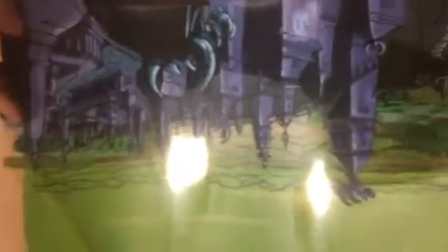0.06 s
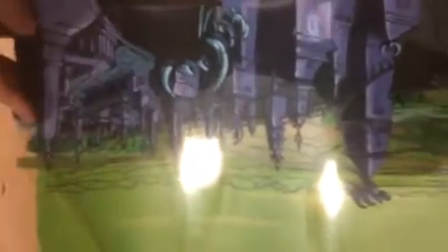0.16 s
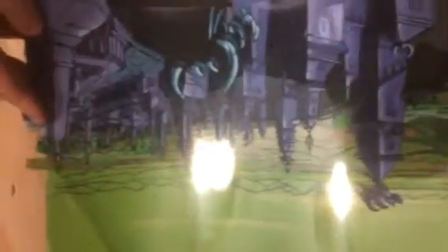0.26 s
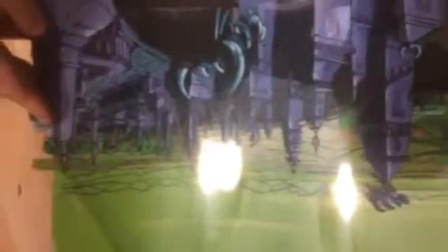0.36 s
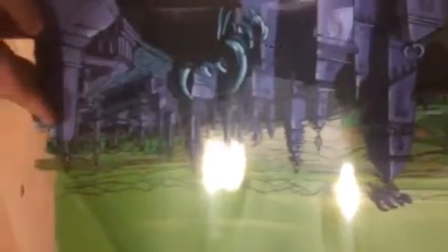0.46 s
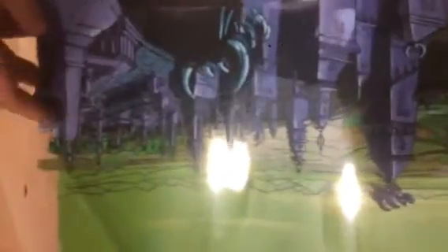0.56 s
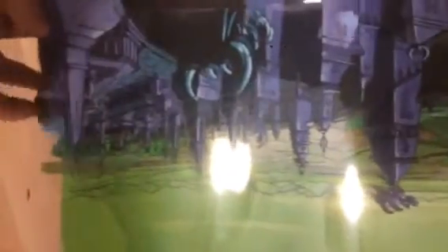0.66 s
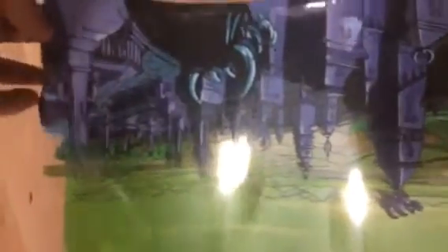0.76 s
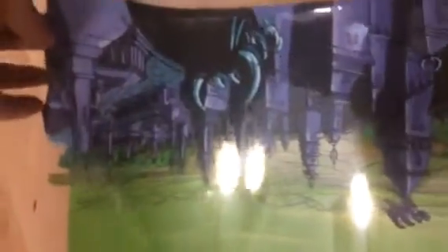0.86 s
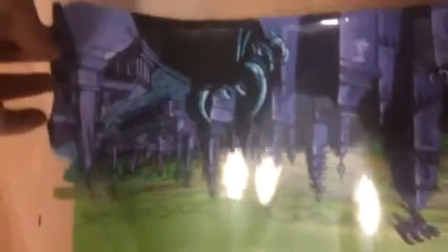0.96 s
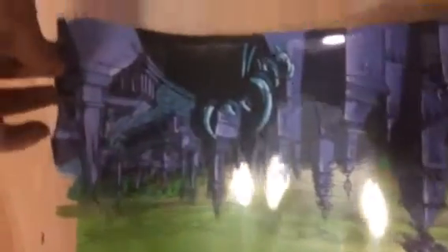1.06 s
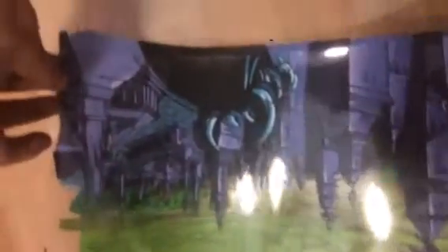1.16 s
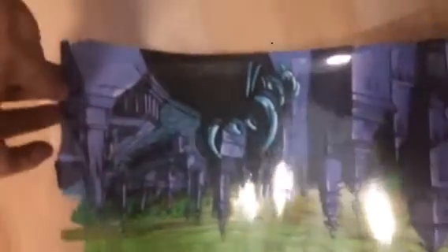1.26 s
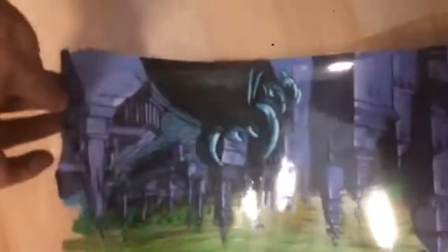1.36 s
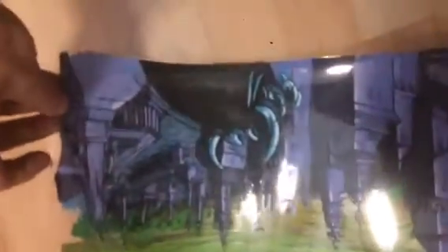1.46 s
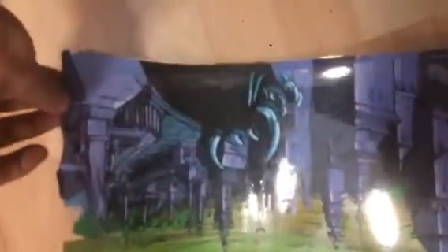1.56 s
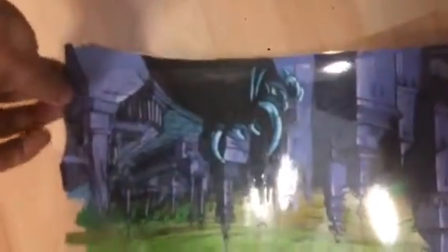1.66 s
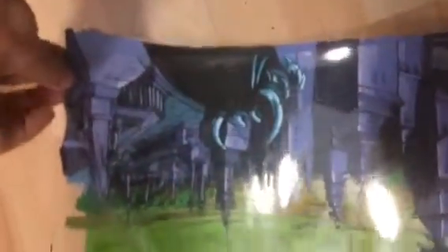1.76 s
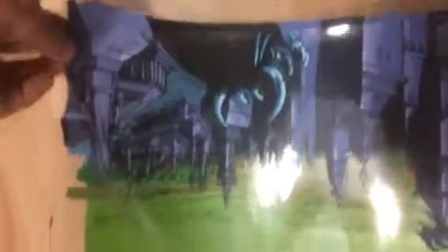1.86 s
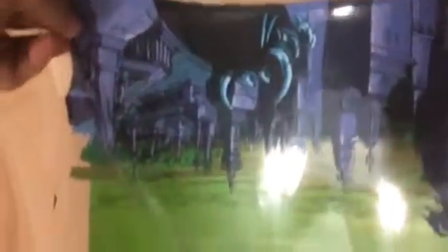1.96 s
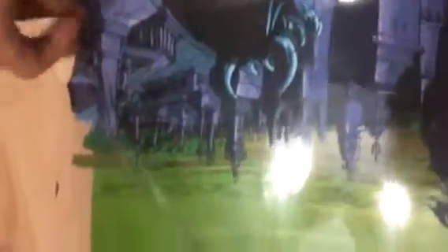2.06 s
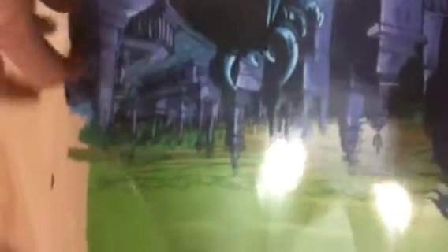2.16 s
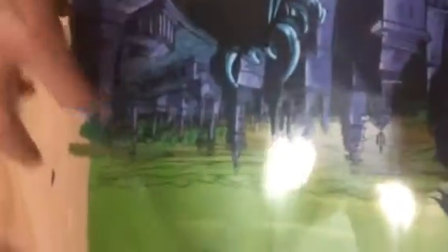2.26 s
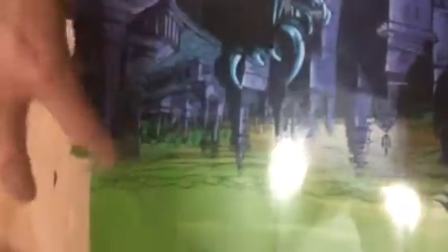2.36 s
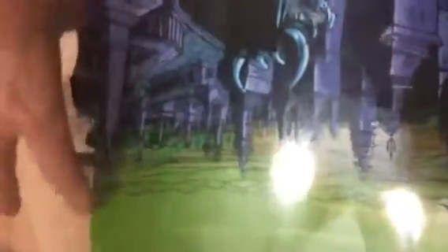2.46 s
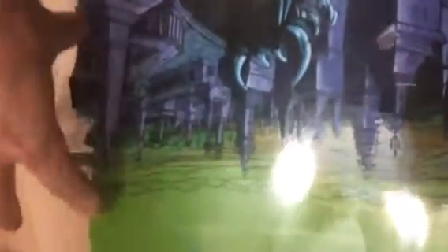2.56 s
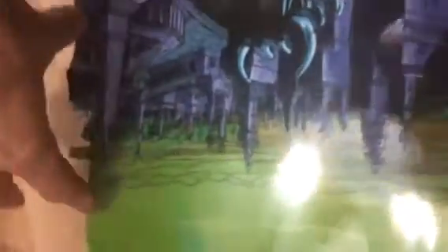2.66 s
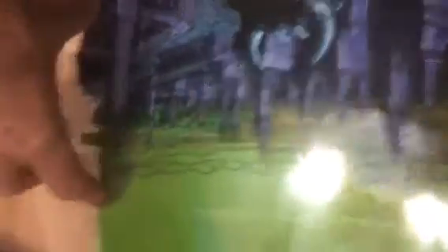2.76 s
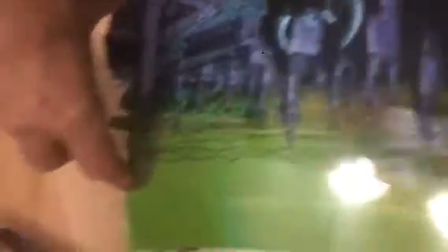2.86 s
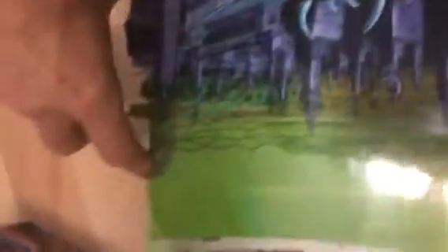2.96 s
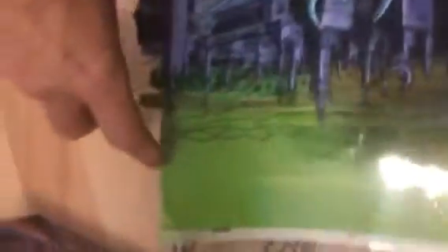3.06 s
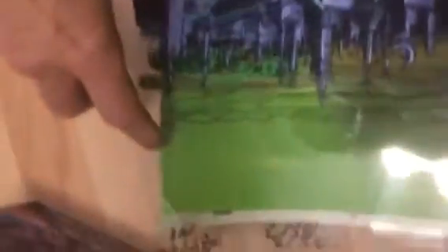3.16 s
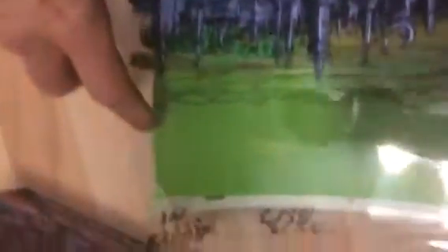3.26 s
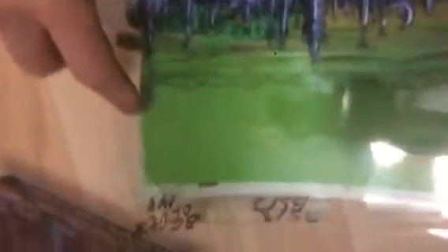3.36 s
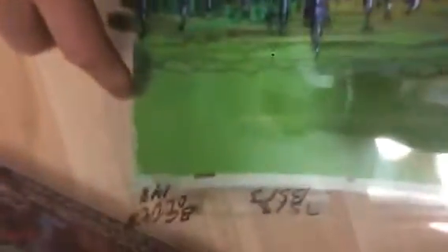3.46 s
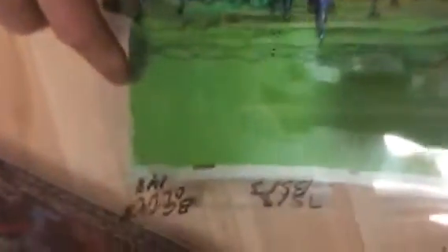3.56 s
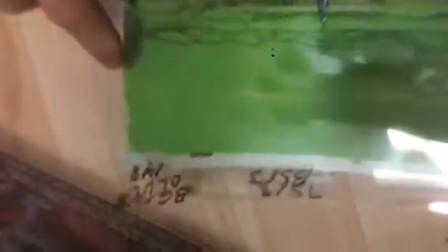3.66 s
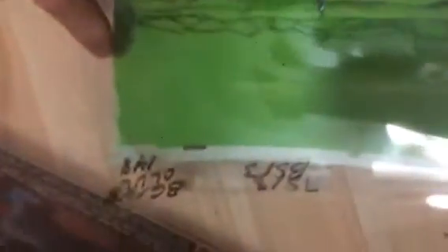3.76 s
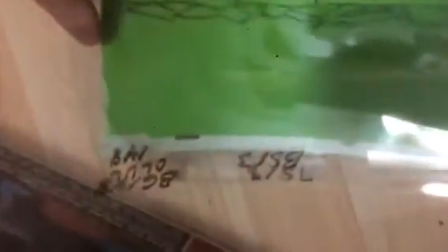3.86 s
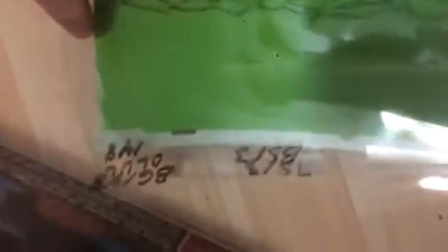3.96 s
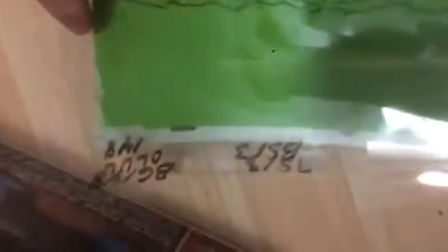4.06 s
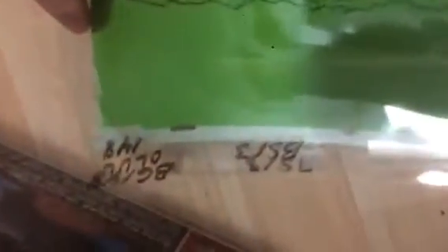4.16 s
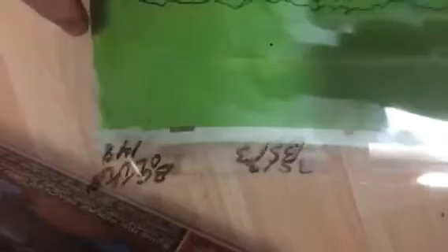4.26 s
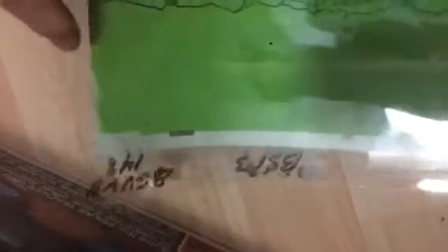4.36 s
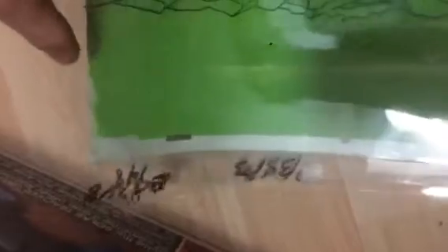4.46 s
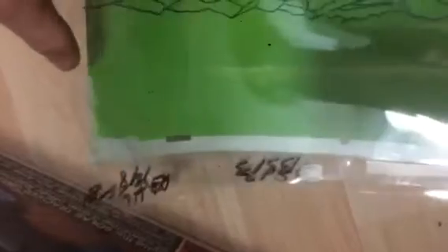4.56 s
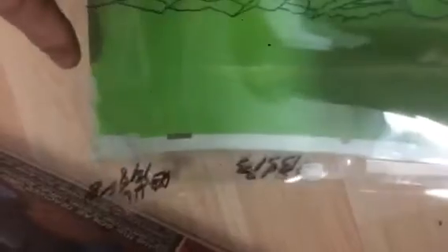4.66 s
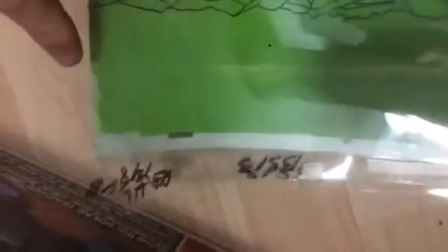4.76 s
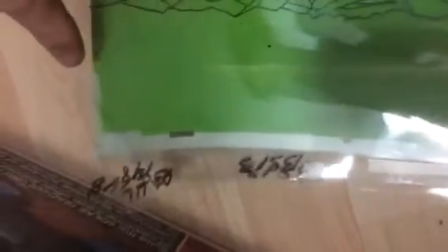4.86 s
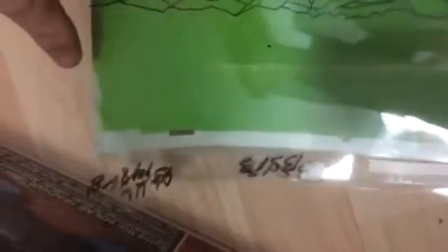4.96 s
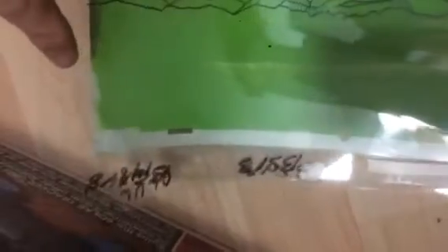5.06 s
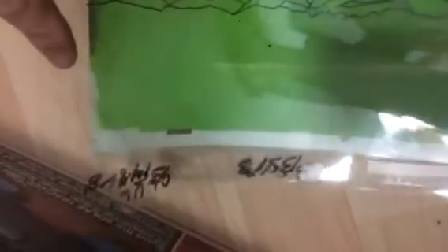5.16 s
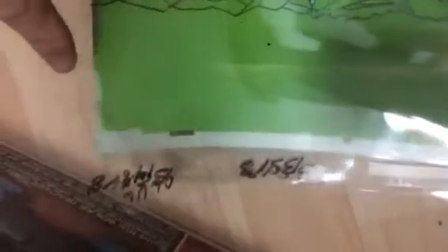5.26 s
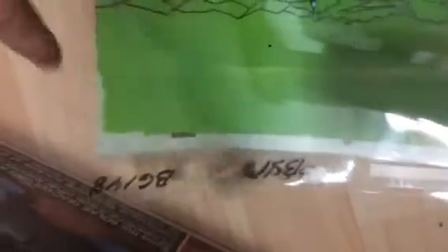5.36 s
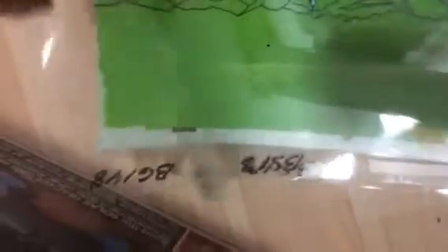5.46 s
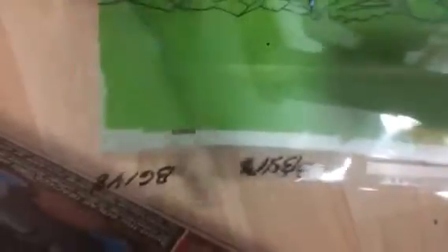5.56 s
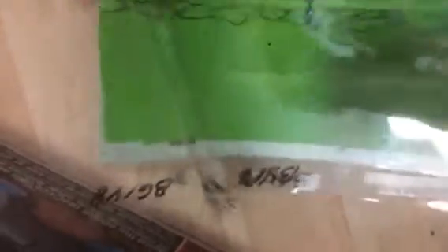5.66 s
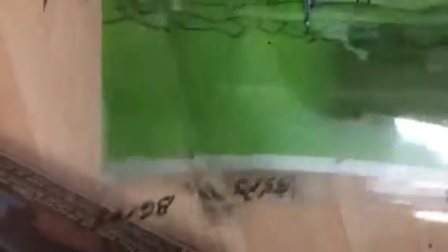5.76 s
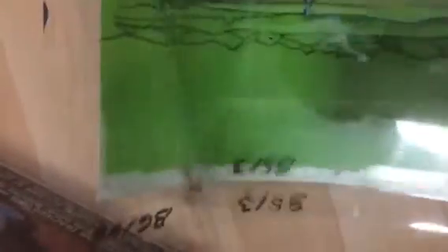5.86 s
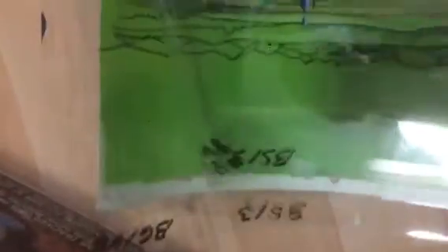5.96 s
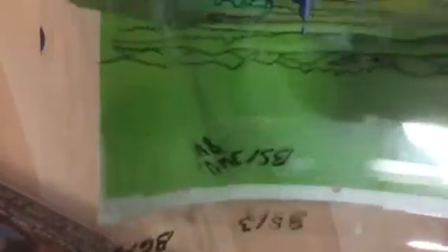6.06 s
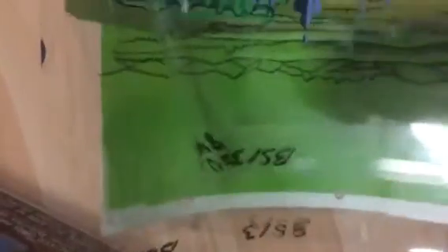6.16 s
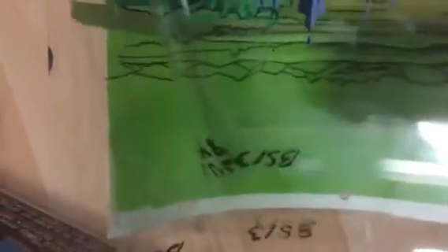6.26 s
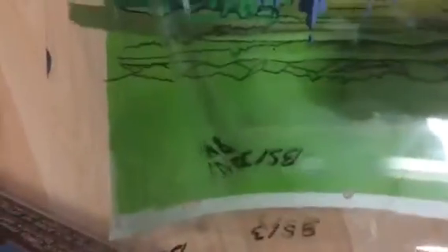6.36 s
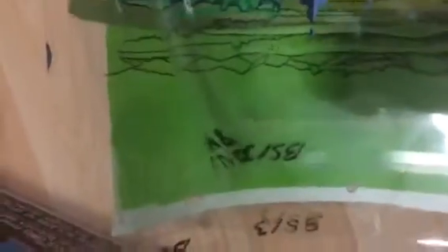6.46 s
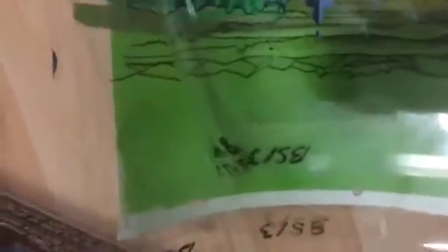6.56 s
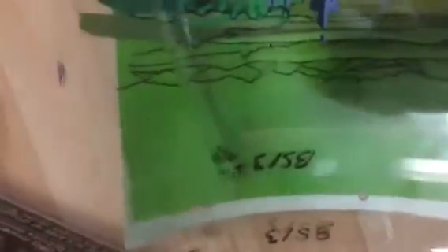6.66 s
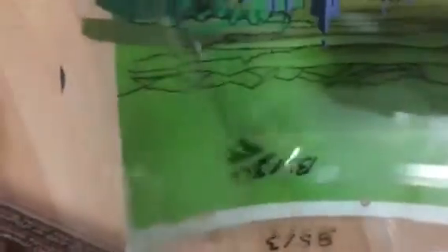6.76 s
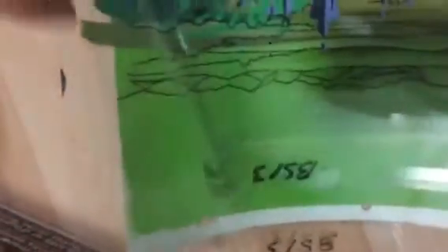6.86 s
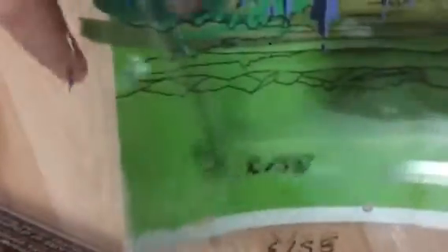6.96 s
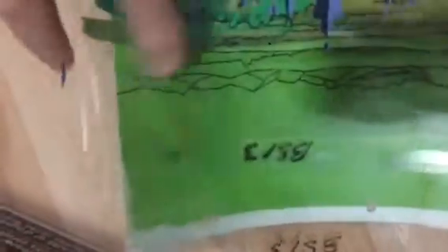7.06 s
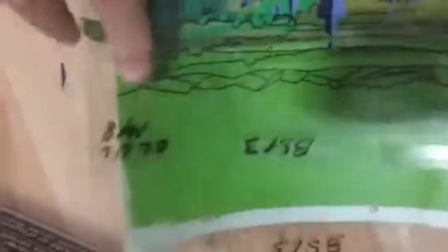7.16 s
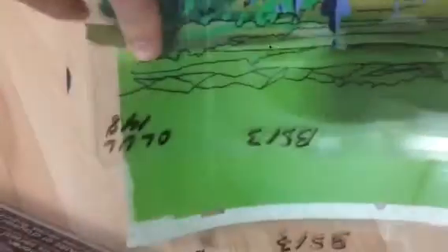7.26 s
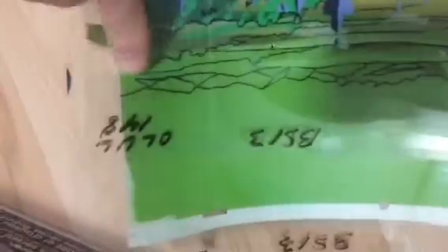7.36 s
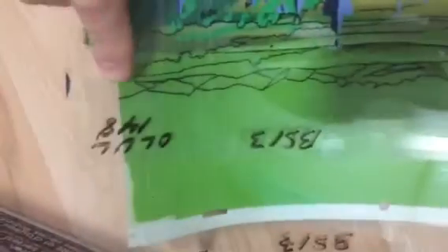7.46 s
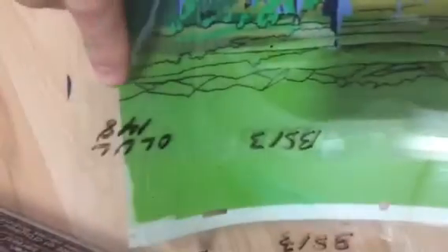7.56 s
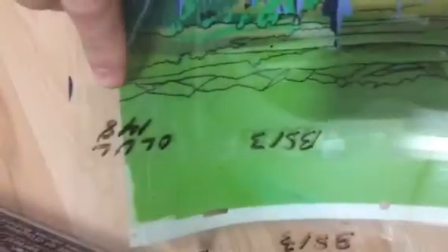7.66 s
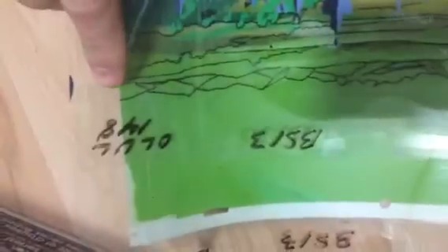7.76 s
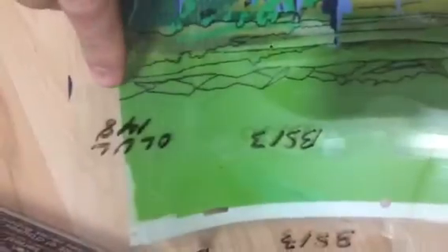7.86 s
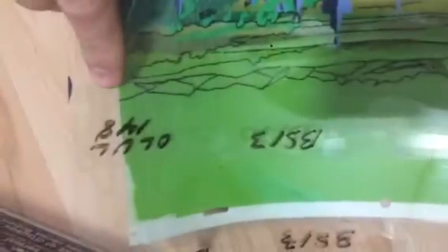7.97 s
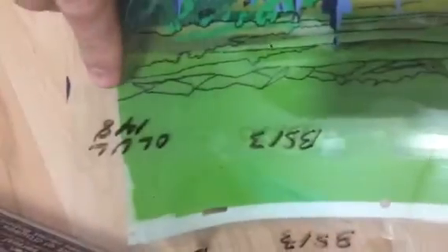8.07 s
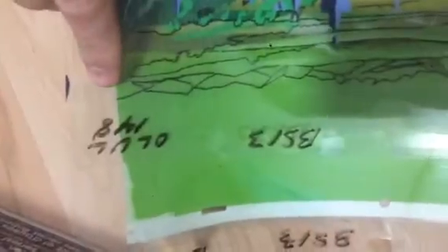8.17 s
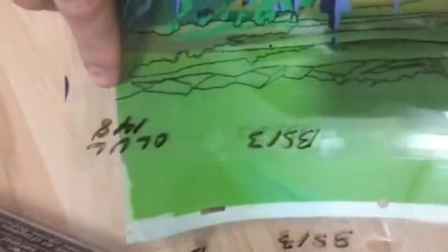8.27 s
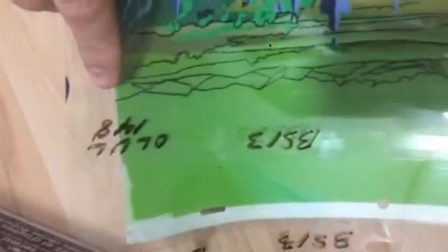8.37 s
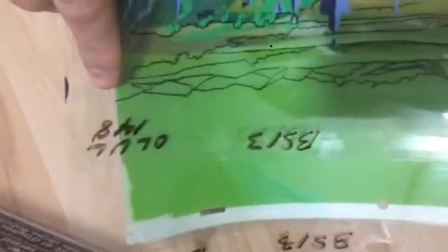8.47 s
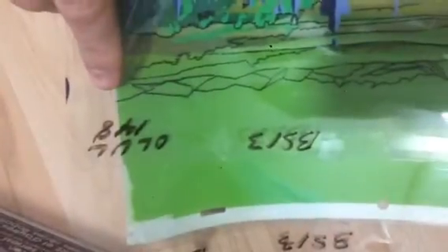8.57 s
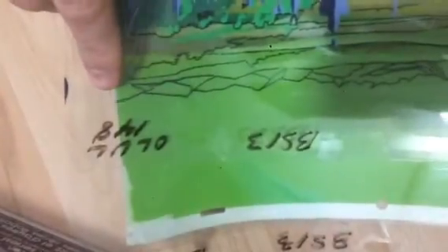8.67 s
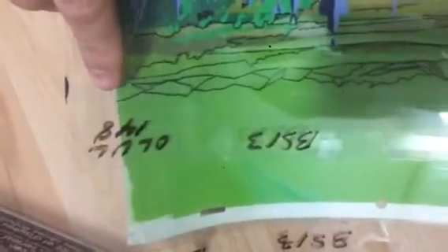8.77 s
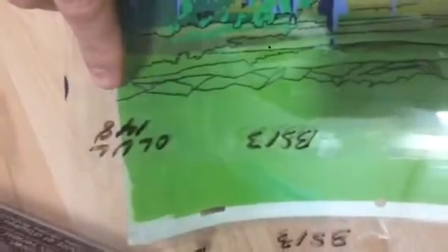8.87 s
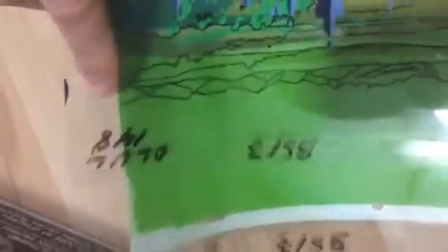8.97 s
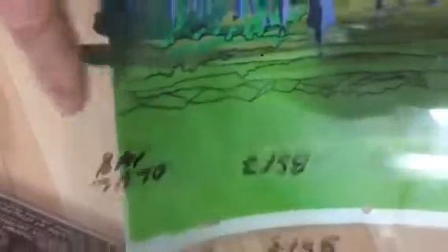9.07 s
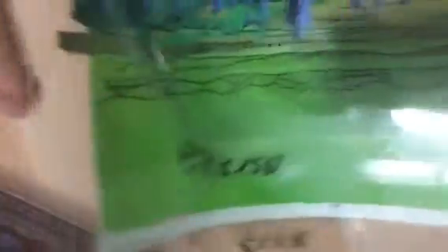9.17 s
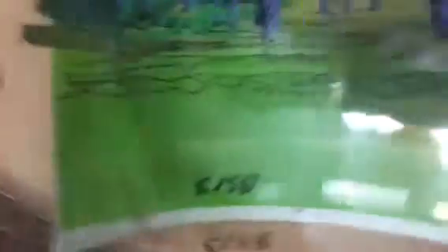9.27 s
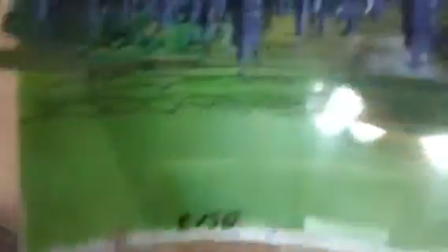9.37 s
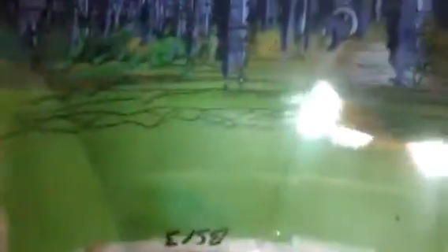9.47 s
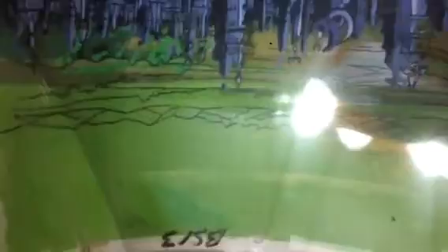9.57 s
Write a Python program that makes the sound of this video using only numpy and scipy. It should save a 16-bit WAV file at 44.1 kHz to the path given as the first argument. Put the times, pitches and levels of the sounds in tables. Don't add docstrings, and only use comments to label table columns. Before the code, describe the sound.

A quiet room with a faint low hum, heard by one close microphone. Fingers barely brush stiff plastic film at 0.1 s; a ringing click with a short rub comes at 0.77 s. A soft swish and tick at 1.6 s lead to a loud bright snap with a wooden thud at 2.2 s, a second crunch right behind it, then rustling until 2.9 s. Faint rubbing fades; a low click falls at 3.57 s. Dull, slightly singing strokes run 4.3-4.6 s. At 5.43 s the film buckles in a loud springy snap, followed by light hiss, clicks at 5.8-5.9 s and a bright step at 5.97 s. Clicks, rubs and low thuds cluster from 6.8 to 7.3 s. Near stillness follows with tiny ticks. From 9.08 to 9.21 s creases crackle rapidly, a dull knock hits at 9.23 s, and squeaky scraping fades away.

```python
import sys
import numpy as np
from scipy import signal
from scipy.io import wavfile
from scipy.ndimage import uniform_filter1d

SR = 44100
rng = np.random.default_rng(int(sys.argv[2]) if len(sys.argv) > 2 else 0)


def transcribe(signal):
    frames = np.atleast_2d(signal).T
    limited = np.clip(frames, -1, 1)
    pcm = np.round(limited * 32767).astype(np.int16)
    wavfile.write(sys.argv[1], SR, pcm)


def gain_from_db(level_db):
    decades = np.asarray(level_db, float) / 20
    return 10 ** decades


N = 423360

# (frequency [Hz], level [dB])
FIZZ = [(4000, -33.5), (6500, 10.5), (9000, 6.5), (12000, 3.5), (15000, -1), (16500, -7)]


def evened(x):
    return x / np.sqrt(np.mean(x ** 2) + 1e-20)


def read(points, hz):
    f, value = np.transpose(points)
    return np.interp(np.log(hz + 1), np.log(f + 1), value)


def causal(points, size=1024):
    gain = np.log(gain_from_db(read(points, abs(np.fft.fftfreq(size, 1 / SR)))))
    phase = -signal.hilbert(gain).imag
    pulse = np.fft.ifft(np.exp(gain + 1j * phase)).real[:size // 2]
    return pulse / abs(pulse).max()


def band_gain(db, hz, lo_hz, hi_hz):
    gain = gain_from_db(db)
    inside = (hz >= lo_hz) & (hz < hi_hz)
    return gain / np.sqrt((gain[inside] ** 2).sum(0) / len(hz))


def held_during(table, t, size):
    start, length, *values = np.transpose(table)[:, :, None]
    inside = (t > start) & (t < start + length)
    return [uniform_filter1d((value * inside).sum(0), size=size) for value in values]


def add(mix, s, sound):
    part = mix[round(s * SR):][:len(sound)]
    part += sound[:len(part)]


def hum():
    # (frequency [Hz], level [dB per Hz])
    noise_spectrum = [(22, -33.5), (50, -3.5), (125, -8), (150, -18), (1000, -29.5), (3330, -37),
                      (14700, -39.5), (16500, -52.5)]
    # (time [s], level [dB])
    rumble = [(0.0, -68.5), (1.6, -66), (3.2, -69), (4.8, -65), (6.4, -62), (7.2, -63), (8.8, -66),
              (9.6, -62.5)]
    level_db = -65.5
    hz, t = np.fft.rfftfreq(2048, 1 / SR), np.arange(N // 512 + 5) * 512 / SR
    a, b = rng.standard_normal((len(t), len(hz), 2)).T
    white = a + 1j * b
    s, rumble_db = np.transpose(rumble)
    lumps = evened(uniform_filter1d(rng.standard_normal(len(t)), size=8))
    swell_db = np.interp(t, s, rumble_db) - level_db + 2 * lumps
    motor_db = 6 / (1 + ((hz - 120) / 9) ** 2)
    db = (read(noise_spectrum, hz) + motor_db)[:, None]
    steady = np.sqrt((gain_from_db(db) ** 2).mean())
    bass = 1 / (1 + (hz[:, None] / 150) ** 4)
    unit = signal.istft(white, nperseg=2048, noverlap=1536)[1].std()
    noise = signal.istft(white * gain_from_db(db + bass * swell_db), nperseg=2048, noverlap=1536)[1]
    return gain_from_db(level_db) * noise[:N] / unit / steady


def room(x):
    # (frequency [Hz], t60 [s])
    decay = [(200, .25), (1000, 0.13), (4000, 0.15), (12000, .1)]
    taps = np.zeros(SR // 2)
    at = np.arange(160, len(taps) - 20, 20)
    at = at + rng.integers(0, 20, len(at))
    taps[at] = rng.choice([-1., 1.], len(at))
    hz, t, z = signal.stft(taps, SR, nperseg=256)
    fall = gain_from_db(-60 * t / read(decay, hz)[:, None])
    tail = signal.istft(z * fall, SR, nperseg=256)[1]
    return signal.fftconvolve(x, tail / np.linalg.norm(tail))[:N]


def thuds(cycles=7.0, rise_s=.002):
    # (time [s], peak level [dB], frequency [Hz])
    blows = [(.082, -45.5, 310), (0.109, -43.5, 189), (0.782, -40.5, 124.4), (1.605, -42, 248),
             (2.203, -33, 330), (2.205, -31, 750), (2.204, -36, 200), (2.5, -48, 300), (3.869, -48, 257),
             (5.445, -37, 142), (5.505, -42, 102.8), (5.548, -42, 125.4), (5.835, -47, 800),
             (6.783, -40, 81), (6.831, -45.5, 74.5), (6.995, -35, 153.5), (6.997, -36, 750),
             (6.787, -41, 560), (9.1, -40, 450), (7.066, -44.5, 150), (7.1845, -33, 95.8),
             (7.187, -33, 300), (7.193, -39, 800), (8.698, -49, 950), (9.015, -52, 650), (9.208, -35, 620)]
    out, t = np.zeros(N), np.arange(6000) / SR
    for s, peak_db, hz in blows:
        sag = 1 + .35 * np.exp(-t / 0.0068)
        note = np.sin(2 * np.pi * hz * t * sag)
        fall = gain_from_db(peak_db - 60 * t * hz / cycles)
        add(out, s, fall * note * np.minimum(t / rise_s, 1))
    return out


def squeaks(rise=0.0316, rough=0.243):
    # (middle time [s], length [s], peak level [dB], frequency [Hz])
    whistles = [(9.2339, .0042, -14.5, 1620), (.7733, .006, -26, 1990), (.772, .005, -27, 4600),
                (0.027, 0.0476, -71.5, 4870), (4.399, 0.0214, -58, 6070), (4.452, 0.0233, -54.5, 6100),
                (5.96, 0.023, -43.5, 1248), (9.326, .04, -45, 5186), (9.434, .03, -51, 5900),
                (9.374, 0.047, -46, 4010), (9.372, .05, -42, 2930), (.13, .03, -59, 1400),
                (.163, .01, -63, 2400), (.764, .022, -38, 2050), (.765, .025, -49, 720),
                (2.252, .008, -30, 2100), (2.655, .008, -50, 3400), (5.432, .006, -36, 1450),
                (5.9, .03, -44, 2800), (5.9687, .007, -33, 730), (6.163, .005, -51, 6500),
                (6.183, .02, -54, 3150), (6.219, .022, -52, 2400), (6.9992, .005, -34, 950),
                (7.187, .003, -26, 10800), (7.224, .012, -47, 3500), (9.069, .01, -50, 530),
                (8.862, .003, -60, 3700), (9.333, .03, -45, 3150)]
    out = np.zeros(N)
    wobble = evened(uniform_filter1d(rng.standard_normal((len(whistles), 4000)), size=90))
    for (s, length, peak_db, hz), noise in zip(whistles, wobble):
        u = np.linspace(-.5, .5, min(round(length * SR), 4000))
        phase = 2 * np.pi * np.cumsum(hz * (1 + rise * u)) / SR
        tone = np.sin(phase + noise[:len(u)] * rough)
        unsteady = 1 + rough * noise[::-1][:len(u)]
        add(out, s - length / 2, gain_from_db(peak_db) * tone * np.cos(np.pi * u) * unsteady)
    return out


def gliding_bands(table, width, held=0.):
    out = np.zeros(N)
    a, b = rng.standard_normal((len(table), 9000, 2)).transpose(2, 0, 1)
    for (s, length, level_db, from_hz, to_hz), noise in zip(table, a + 1j * b):
        u = np.linspace(-.5, .5, min(round(length * SR), 8000))
        pole = np.exp(-np.pi * width * from_hz / SR)
        slow = signal.lfilter([1], np.poly([pole, pole]), noise)
        slow = slow[1000:1000 + len(u)]
        slow = slow + held * (from_hz < 1500) * abs(slow).mean()
        pitch = from_hz + (to_hz - from_hz) * (u + .5)
        turn = np.exp(2j * np.pi * np.cumsum(pitch) / SR)
        add(out, s - length / 2, gain_from_db(level_db) * evened((slow * turn).real) * np.cos(np.pi * u))
    return out


def singing_spots():
    # (middle time [s], length [s], level [dB], start pitch [Hz], end pitch [Hz])
    spots = [(2.41, .06, -55, 1900, 1850), (2.505, .035, -46, 2250, 2150), (2.512, .055, -48, 3750, 4150),
             (2.503, .03, -52, 6300, 6200), (2.635, .08, -57, 3600, 3450), (2.87, .06, -55, 2650, 2750),
             (2.87, .07, -58, 4250, 4100), (3.1, .18, -70, 2900, 2750), (3.11, .08, -65, 1300, 1120),
             (3.165, .07, -68, 1080, 1030), (3.215, .06, -66, 1150, 1040), (3.285, .1, -67, 880, 1060),
             (3.29, .08, -68, 1250, 1400), (3.18, .1, -64, 2000, 2000), (3.19, .09, -67, 1780, 1740),
             (3.28, .12, -65, 1900, 2100), (3.26, .14, -69, 2300, 2330), (4.295, .05, -48, 2150, 1950),
             (4.295, .03, -57, 2900, 2900), (4.3, .05, -58, 4100, 4200), (4.345, .06, -57, 2050, 2000),
             (4.397, .05, -52, 1850, 1850), (4.445, .08, -48, 1850, 2300), (4.492, .06, -52, 2150, 1900),
             (4.443, .055, -53, 3450, 3800), (4.467, .04, -54, 1150, 1100), (4.545, .11, -57, 2200, 2170),
             (4.53, .08, -57, 1750, 1800), (4.575, .09, -63, 2950, 2850), (5.4, .04, -51, 3200, 3000),
             (5.414, .03, -42, 3200, 3800), (6.005, .006, -46, 6200, 6200), (6.013, .006, -48, 6200, 6200),
             (6.019, .006, -47, 6100, 6100), (6.034, .008, -44, 7000, 6000), (9.234, .004, -31, 5500, 5300),
             (9.244, .016, -42, 1550, 1500), (9.255, .03, -48, 1000, 900), (.95, .06, -66, 2000, 1950),
             (9.348, .055, -47, 2250, 1750)]
    return gliding_bands(spots, width=.08, held=1.2)


def brushing_edges():
    # (middle time [s], length [s], level [dB], start pitch [Hz], end pitch [Hz])
    brushes = [
        (.16, .06, -64, 900, 850),
        (2.257, .022, -33, 7300, 7000),
        (5.603, .045, -52, 8400, 7900),
        (.768, .02, -40, 5800, 6300),
        (5.73, .07, -57, 3100, 2600),
    ]
    return gliding_bands(brushes, width=.2)


def snaps(table, grit_db, rise_s, ring_db, low_hz=30):
    # (frequency [Hz], level [dB])
    crack_spectrum = [(80, -56), (250, -23.5), (600, -4), (1500, -1), (3000, 5), (5000, 10.5), (7000, -19),
                      (10000, -43.5)]
    out, t = np.zeros(N), np.arange(3000) / SR - rise_s
    no_bass = signal.butter(4, 540, "high", fs=SR)
    low_cut = signal.butter(3, low_hz, "high", fs=SR)
    noise = rng.standard_normal((len(table), len(t)))
    for (s, peak_db, hz, t60, treble_db), spray in zip(table, noise):
        fall = gain_from_db(-60 * np.maximum(t, 0) / np.clip(t60, .002, .09))
        loading = np.clip(1 + t / rise_s, 0, 1) ** 2
        kick = gain_from_db(grit_db) * spray * fall * loading
        kick[round(rise_s * SR)] += 1
        pole = np.exp(np.pi * (2j * hz - .15 * hz - 250) / SR)
        ring = signal.lfilter([1], [1, -pole], kick).imag
        ring = signal.lfilter(*no_bass, ring)
        shift = (hz / 3200) ** 0.27
        crack = causal([(f * shift, db) for f, db in crack_spectrum])
        tilt_db = 0.64 * min(treble_db, 4)
        fizz = causal([(f, db + tilt_db * max(np.log2(f / 7000), 0)) for f, db in FIZZ])
        body, top = (evened(signal.fftconvolve(kick, colour)[:len(t)]) for colour in (crack, fizz))
        body = evened(body + gain_from_db(ring_db) * evened(ring)) + gain_from_db(treble_db) * top
        body = signal.lfilter(*low_cut, body)
        add(out, s - rise_s, gain_from_db(peak_db) * body / abs(body).max())
    return out


def clean_buckles():
    # (time [s], peak level [dB], ring [Hz], t60 [s], treble level [dB])
    clicks = [
        (0.7805, -21.5, 2130, 0.021, -27),
        (2.2064, -13, 3160, 0.0045, -10.5),
        (3.5748, -28, 1200, 0.014, -8),
        (5.8189, -28.5, 2700, 0.0056, -11),
        (6.7806, -29, 2480, 0.01, -10),
        (7.0405, -32, 2370, 0.012, -12),
        (7.1722, -29.5, 3900, 0.0081, -2),
        (7.1865, -19.5, 2703, 0.012, -2),
        (9.2335, -13, 1080, 0.007, -39.5),
    ]
    # (time [s], peak level [dB], ring [Hz], treble level [dB])
    ticks = [(0.2071, -48.5, 2160, -19.5), (1.6088, -37, 745, -3), (2.8016, -46, 620, -1.5),
             (2.8382, -45.5, 2650, 0.5), (3.5652, -37, 2600, -6), (5.132, -39, 1500, -7.5),
             (5.6471, -50, 2860, 7), (5.891, -33, 3500, -4), (5.9043, -35.5, 2860, -8),
             (6.952, -49.5, 5000, 7), (7.0709, -33.5, 1080, -16), (7.2017, -30, 5000, 4),
             (7.247, -46, 5000, 9.5), (7.98, -48.5, 2690, -2.5), (8.0227, -54, 708, -3.5),
             (8.9916, -35.5, 5330, -5.5), (9.5496, -42.5, 4100, 5)]
    tick_t60 = 0.013
    both = clicks + [(s, db, hz, tick_t60, treble_db) for s, db, hz, treble_db in ticks]
    return snaps(both, grit_db=-12, rise_s=.0012, ring_db=2.5)


def gritty_buckles():
    # (time [s], peak level [dB], ring [Hz], t60 [s], treble level [dB])
    crunches = [(0.1102, -47, 1390, 0.019, -25.5), (0.7688, -24, 2100, 0.0197, -18.5),
                (1.6008, -40, 2390, 0.032, -5), (2.204, -19, 3490, 0.021, -6.5),
                (2.2127, -27, 1940, 0.016, -15.5), (2.2537, -21, 2420, 0.0104, -4),
                (2.2581, -25, 3680, 0.0085, -8), (4.2866, -46.5, 2130, 0.026, -27),
                (4.2978, -42, 2110, 0.0226, -26.5), (5.446, -32, 700, 0.02, -28),
                (7.0009, -25, 3500, 0.0115, -18), (8.6831, -46.5, 991.5, 0.0135, -28.5),
                (9.1057, -27, 1960, 0.017, -2.5), (9.24, -32, 1560, 0.071, -29)]
    return snaps(crunches, grit_db=3.5, rise_s=0.0032, ring_db=10)


def lifted_buckles():
    # (time [s], peak level [dB], ring [Hz], t60 [s], treble level [dB])
    lifted = [
        (5.4215, -26, 3000, .006, -13),
        (5.4261, -15, 3450, 0.01, -17),
        (5.428, -17, 3900, .006, -17),
        (5.43, -11, 3800, 0.0053, -18),
    ]
    return snaps(lifted, grit_db=-12, rise_s=.0012, ring_db=2.5, low_hz=2300)


def bare_steps():
    # (time [s], peak level [dB], ring [Hz], t60 [s], treble level [dB])
    steps = [
        (5.9674, -13, 2100, 0.006, 3),
    ]
    return snaps(steps, grit_db=-28, rise_s=.001, ring_db=-6, low_hz=600)


def rips(grit_db=-17, detune=.04):
    # (frequency [Hz], width [Hz], level [dB])
    flap = [(1750, 700, 0), (4650, 1500, 0), (6300, 1200, -6), (9000, 4000, -17), (3300, 1500, -13),
            (1000, 300, -7), (600, 300, -7)]
    # (time [s], peak level [dB], t60 [s], level of the low rings [dB])
    creases = [(9.0805, -27, .008, -10), (9.1013, -30, .012, -3), (9.1184, -12, .007, -12),
               (9.131, -27, .012, -14), (9.135, -27, .01, -14), (9.14, -17, .009, -12),
               (9.143, -25, .008, -12), (9.1471, -10, .008, -6), (9.1516, -18, .007, -4),
               (9.1575, -16, .01, -8), (9.1627, -15, .008, -8), (9.1652, -21, .01, -6),
               (9.169, -26, .01, -6), (9.2099, -11, .007, -2)]
    out, t = np.zeros(N), np.arange(1500) / SR
    noise = rng.standard_normal((len(creases), len(t)))
    for (s, peak_db, t60, low_db), spray in zip(creases, noise):
        kick = gain_from_db(grit_db - 60 * t / np.clip(t60, .002, .05)) * spray
        kick[0] = 1
        body = np.zeros(len(t))
        for k, (hz, width, db) in enumerate(flap):
            ring_hz = hz * (1 + detune * spray[-1 - k])
            pole = np.exp(np.pi * (2j * ring_hz - width) / SR)
            ring = signal.lfilter([1, -1], np.poly([pole, pole]), kick).imag
            body += gain_from_db(db + low_db * (hz < 2500)) * evened(ring)
        add(out, s - .0004, gain_from_db(peak_db) * body / abs(body).max())
    return out


def strokes():
    # (bite time [s], time to lose 20 dB [s], level [dB], gap resonance [Hz], fizz against level [dB])
    jerks = [(.118, 0.06, -65.5, 1580, -18.5), (0.722, 0.022, -52, 2200, -10),
             (.788, 0.1425, -47, 1900, -11.5), (1.05, 0.56, -72.5, 1850, -4.5),
             (2.207, 0.0053, -29, 1989, -17.5), (2.272, 0.1571, -51.5, 1810, -7),
             (2.4, .095, -47.5, 1880, -7.5), (2.496, 0.0734, -43, 4000, -9.5),
             (3.576, 0.07, -52, 1970, -18.5), (4.283, 0.099, -51, 2104, -22),
             (5.151, 0.06, -59.5, 3200, -9), (5.44, 0.43, -53.5, 3600, -10.5), (5.704, 0.4, -58, 3000, -8),
             (5.819, 0.0972, -50, 2264, -2), (6.783, 0.05, -53, 3030, -5.5), (6.791, .01, -55, 4000, 3),
             (6.806, .006, -60, 4000, 2), (6.82, .006, -61, 4000, 3), (6.84, 0.35, -61, 1580, -10.5),
             (6.997, 0.0312, -35, 2100, -13.5), (7.007, 0.1287, -40, 3287, -8.5),
             (7.194, 0.08, -48, 3360, -7), (7.257, 0.06, -53, 2103, -13), (9.21, 0.006, -30.5, 1800, -9.5),
             (9.234, 0.004, -30, 1650, -21.5)]
    # (top time [s], time to lose 20 dB [s], level [dB], gap resonance [Hz], fizz against level [dB])
    sweeps = [(0.957, 0.1351, -61.5, 1930, -9.5), (1.607, 0.0955, -58.5, 1780, -11.5),
              (2.256, 0.0368, -35.5, 2010, -9), (2.631, 0.1151, -52, 3660, -7.5),
              (2.73, .045, -61, 3660, -7.5), (2.803, .03, -61, 3080, -15), (4.45, 0.1247, -47, 2050, -14),
              (4.809, 0.21, -71.5, 2950, -5), (6.774, .04, -57, 3500, 1), (7.285, .06, -47, 2150, -12),
              (6.218, 0.14, -60.5, 4400, -2), (7.858, 0.03, -68, 3010, -15.5), (8.49, .5, -74, 1500, -24),
              (9.075, 0.0582, -43.5, 4500, -10), (9.15, 0.0339, -34, 4450, -6.5),
              (9.445, .09, -44, 3880, -4.5)]
    # (start [s], length [s], level [dB], gap resonance [Hz], fizz against level [dB])
    drags = [(.668, .024, -60, 3300, -6), (2.221, .025, -46.5, 2040, -10.5),
             (2.842, .054, -52, 2710, -13.5), (3.025, 0.1006, -65, 2110, -7.5),
             (3.132, 0.1968, -61.5, 1990, -17), (3.598, 0.0555, -67.5, 1980, -14.5),
             (4.399, 0.125, -52, 1940, -23), (4.501, 0.104, -57.5, 2102, -13.5),
             (4.65, 0.0504, -64, 2870, -7.5), (5.06, .09, -60.5, 3207, -10.5),
             (5.388, 0.027, -46.5, 3430, -12.5), (5.586, 0.028, -55, 2780, 2.5),
             (5.817, 0.066, -50, 2270, -7), (5.889, 0.0926, -44.5, 3860, -1.5),
             (5.995, 0.05, -49, 3480, -2), (6.69, 0.13, -58.5, 3060, -7), (7.014, 0.17, -50, 1910, -12.5),
             (7.262, 0.0905, -50, 2234, -13), (8.693, 0.066, -66.5, 1820, -14.5),
             (8.991, 0.047, -59, 1530, -7.5), (9.086, 0.039, -46, 1850, -7), (9.178, 0.071, -44, 1780, -10),
             (9.251, 0.058, -45.5, 1690, -9.5), (9.31, .075, -44, 3160, -9.5),
             (9.541, 0.053, -55, 3520, -8)]
    # (start [s], length [s], level [dB], gap resonance [Hz], fizz against level [dB])
    creeps = [(0.051, 0.648, -74.5, 1636, -9.5), (1.645, 0.5, -76, 1890, -14.5),
              (5.045, .02, -64, 2600, -10), (5.317, .06, -67.5, 4030, -13), (5.655, 0.064, -68, 3200, -0.5),
              (6.058, 0.2, -63.5, 4380, 0), (6.627, 0.04, -73, 1800, -6.5), (6.92, 0.083, -74, 1570, -6.5),
              (1.423, 0.066, -66, 3450, -9), (7.425, 0.0975, -64.5, 2210, -2),
              (7.442, 0.291, -70, 2255, -10.5), (8.802, 0.22, -74, 1770, -10)]
    # (release time [s], time to gain 20 dB [s], level [dB], gap resonance [Hz], fizz against level [dB])
    loads = [
        (.7745, .026, -29, 2000, -9),
        (5.431, 0.0318, -29, 3920, -16.5),
    ]
    bite_s, drag_on_s, drag_off_s, creep_edge_s, let_go_s = .0055, 0.02, 0.021, .06, 0.005
    sweep_lead = 0.9
    t = np.arange(N * 1000 // SR + 2) / 1000
    spans = [(s, s, bite_s, fall) for s, fall, *_ in jerks]
    spans += [(s, s, sweep_lead * fall, fall) for s, fall, *_ in sweeps]
    spans += [(s, s + length, drag_on_s, drag_off_s) for s, length, *_ in drags]
    spans += [(s, s + length, creep_edge_s, creep_edge_s) for s, length, *_ in creeps]
    spans += [(s, s, rise, let_go_s) for s, rise, *_ in loads]
    on, off, rise, fall = np.transpose(spans)[:, :, None]
    level_db, gap_hz, fizz_db = np.transpose(jerks + sweeps + drags + creeps + loads)[2:, :, None]
    lost = np.maximum(np.maximum((on - t) / rise, (t - off) / fall), 0)
    power = gain_from_db(np.maximum(level_db - 20 * lost, -130)) ** 2
    fizz_power = (power * gain_from_db(fizz_db) ** 2).sum(0)
    pitch = np.exp((power ** 2 * np.log(gap_hz)).sum(0) / (power ** 2).sum(0))
    return t, np.sqrt(power.sum(0)), np.sqrt(fizz_power), pitch


def slips(slips_per_s=6000, spread_db=1.5):
    draw = rng.random((N, 2))
    size = gain_from_db(spread_db * np.minimum(-np.log(draw[:, 0] + 1e-9), 4))
    train = evened((draw[:, 1] < slips_per_s / SR) * size * rng.standard_normal(N))
    return evened(train + .8 * rng.standard_normal(N))


def contact_spots(frames, bins):
    patches, streaks = rng.standard_normal((frames, bins, 2)).T
    patches = evened(uniform_filter1d(uniform_filter1d(patches, size=10, axis=0), size=10, axis=1))
    streaks = evened(uniform_filter1d(uniform_filter1d(streaks, size=3, axis=0), size=28, axis=1))
    colour = gain_from_db(1.7 * patches + 2.0 * streaks)
    return colour / np.sqrt((colour ** 2).mean())


def rubbing(dull=0.63):
    # (frequency [Hz], width [Hz], level [dB])
    sheet = [(3400, 400, 2), (4700, 500, 2), (6300, 700, 1)]
    # (frequency [Hz], level [dB])
    rub_spectrum = [(1000, -21), (1500, 3.5), (2500, 4.5), (4000, 3.5), (6000, -2), (9000, -37)]
    # (frequency [Hz], level [dB])
    table_spectrum = [(150, -20), (350, -9.5), (650, -4.5), (900, -4), (1150, -5.5), (1400, -3.5),
                      (2200, -36)]
    # (start [s], length [s], extra gap ring [dB], extra table level [dB])
    presses = [(0.084, 0.183, 3, 10), (.65, .085, -4, 0), (.74, .06, -2, -7), (.8, .12, -4, -4),
               (2.48, .08, -3, 3), (5.826, .06, -4, 0), (2.386, 0.066, 3.5, -6.5), (2.774, 0.156, -6.5, 1),
               (3.1, .25, 3, 1), (4.271, 0.356, -5, -3.5), (5.0, 0.233, -5, -1.5), (5.36, .075, 1, -14),
               (5.448, 0.145, -8, 3.5), (5.888, 0.185, -1, -9.5), (8.68, 0.083, 0, 7.5),
               (9.132, 0.065, -5.5, 3.5), (9.3, 0.228, -2.5, -10), (7.003, 0.207, -4, -3)]
    # (start [s], length [s], level [dB])
    air = [
        (.74, .05, -14),
        (.8, .09, 3),
        (2.2, .025, -5),
        (2.24, .04, -6),
        (2.385, .2, -2),
        (5.36, .08, -5),
        (5.86, .12, 1),
        (6.7, .25, 3),
        (9.04, .2, -5),
    ]
    hz, t, z = signal.stft(slips(), SR, nperseg=512, noverlap=384)
    f = hz[:, None]
    s, level, fizz_level, pitch = strokes()
    controls = (20 * np.log10(level), 20 * np.log10(fizz_level / level), pitch)
    level_db, bright_db, gap_hz = (np.interp(t, s, uniform_filter1d(c, size=15)) for c in controls)
    firm_db, wood_db = held_during(presses, t, 9)
    gap_db = 2 - .5 * bright_db + firm_db
    table_db = wood_db - 7 - 0.28 * (np.maximum(level_db, -80) + 59) - 3.5 * np.log2(gap_hz / 2000)
    rings_db = sum(db / (1 + (2 * (hz - ring_hz) / width) ** 2) for ring_hz, width, db in sheet)
    gap = gap_db / (1 + ((f / gap_hz - 1) / .135) ** 4)
    gap = gap + 0.19 * gap_db / (1 + ((f / gap_hz - 1.75) / 0.053) ** 2)
    table = read(table_spectrum, f) + 0.66 * gap_db / (1 + ((f - 1150) / 170) ** 2)
    tilt_db = dull * np.clip(bright_db + 6, -20, 8)
    gap = gap + .5 * tilt_db * np.log2(np.maximum(f, 1000) / 2000)
    film_gain = band_gain(read(rub_spectrum, f) + rings_db[:, None] + gap, hz, 1400, 6000)
    table_gain = band_gain(table, hz, 400, 1400) * gain_from_db(table_db)
    body_gain = np.sqrt(film_gain ** 2 + table_gain ** 2)
    fizz_db = read(FIZZ, f) + tilt_db * np.log2(np.maximum(f / 7000, 1))
    air_db, = held_during(air, t, 5)
    shade = gain_from_db(air_db / (1 + (8300 / (f + 1)) ** 12))
    fizz_gain = band_gain(fizz_db, hz, 6000, 15000) * shade
    z = z * contact_spots(len(t), len(hz))
    body, top = (signal.istft(z * g, SR, nperseg=512, noverlap=384)[1][:N] for g in (body_gain, fizz_gain))
    now = np.arange(N) / SR
    return body * np.interp(now, s, level) + top * np.interp(now, s, fizz_level)


def scene():
    snap = clean_buckles() + gritty_buckles() + lifted_buckles() + bare_steps() + rips()
    rub = rubbing() + singing_spots() + brushing_edges()
    echoes = room(gain_from_db(-17) * snap + gain_from_db(-19.5) * rub)
    mono = rub + snap + thuds() + squeaks() + echoes + hum()
    return np.array([mono, mono])


def roll_off(x):
    return signal.sosfilt(signal.butter(12, 16650, fs=SR, output="sos"), x)


def record(dry):
    low_pass = signal.firwin(301, 15850, fs=SR)
    limited = signal.oaconvolve(dry, low_pass[None], "same")
    return roll_off(limited)


dry = scene()
out = record(dry)
transcribe(out)
```